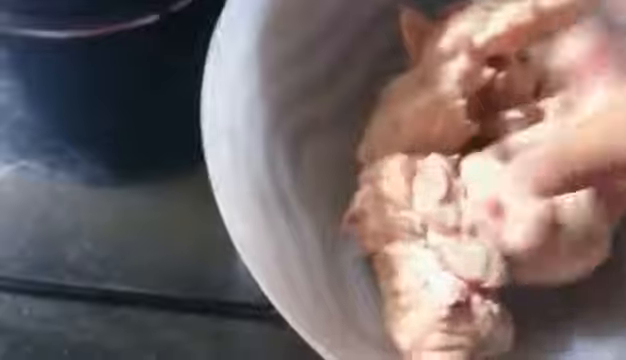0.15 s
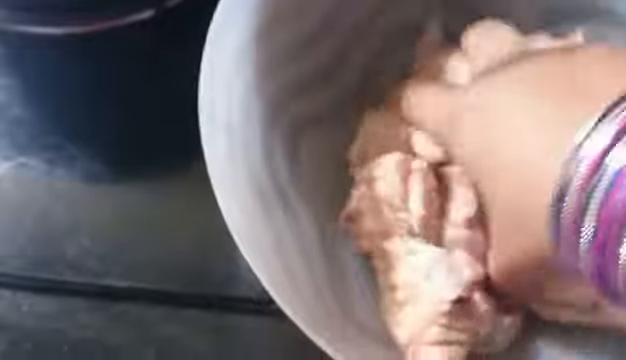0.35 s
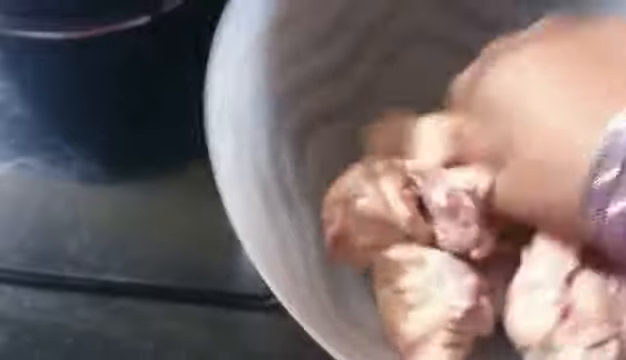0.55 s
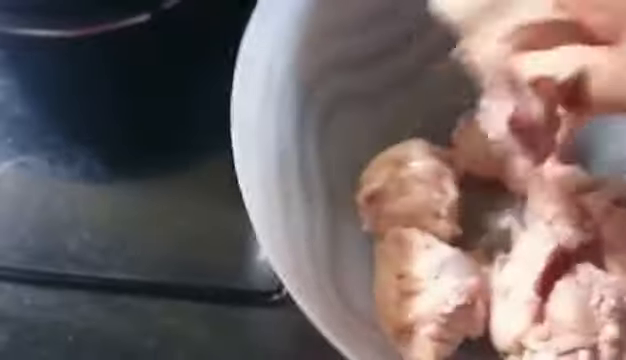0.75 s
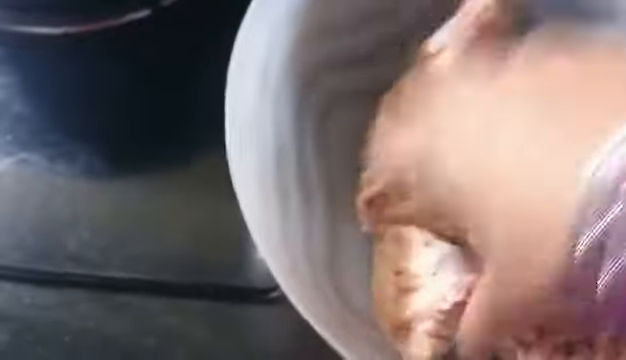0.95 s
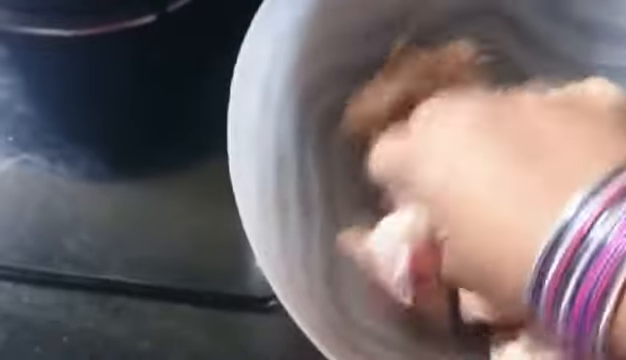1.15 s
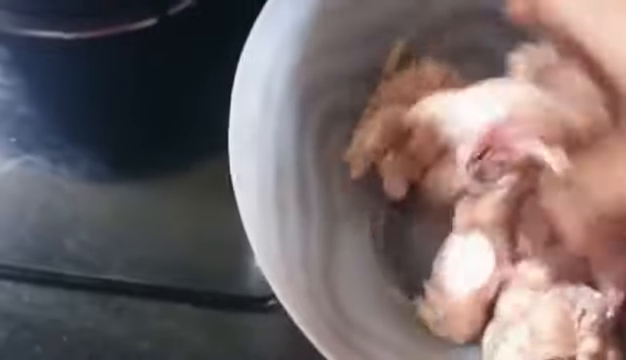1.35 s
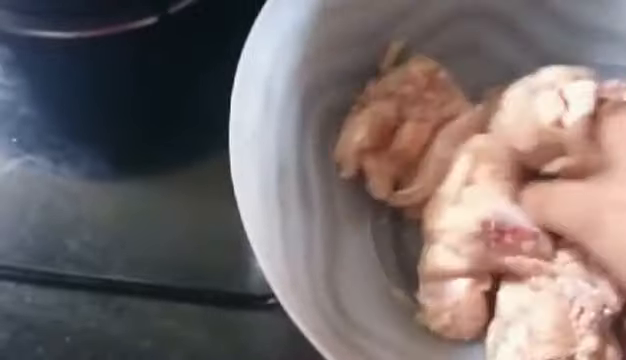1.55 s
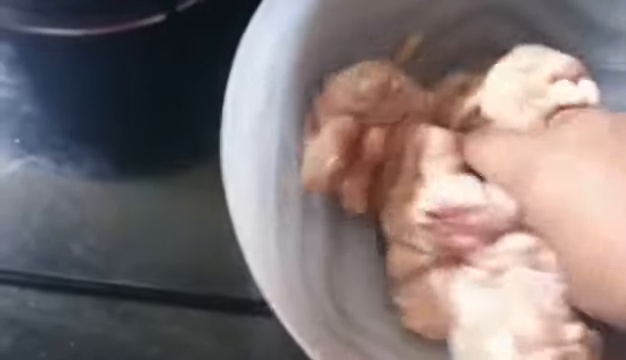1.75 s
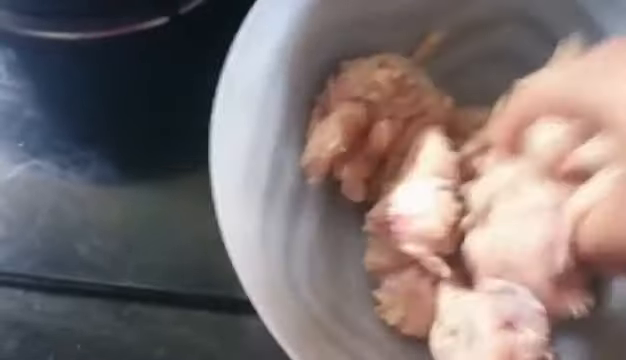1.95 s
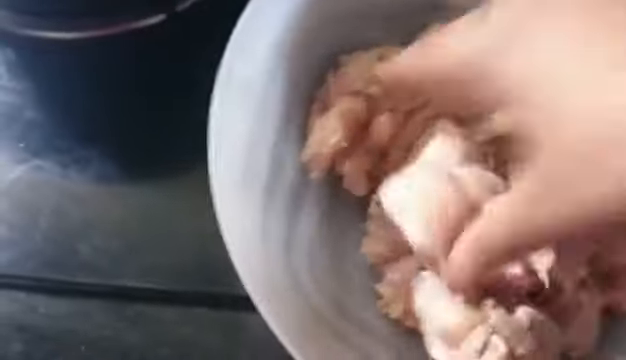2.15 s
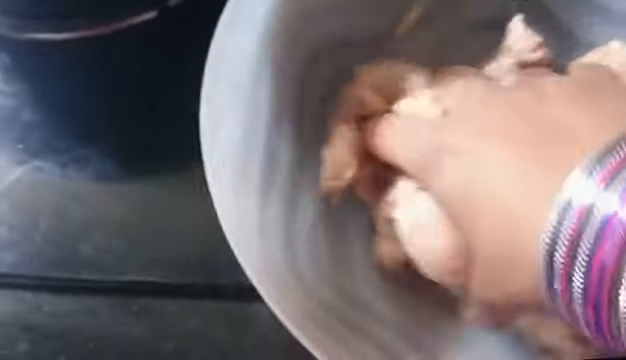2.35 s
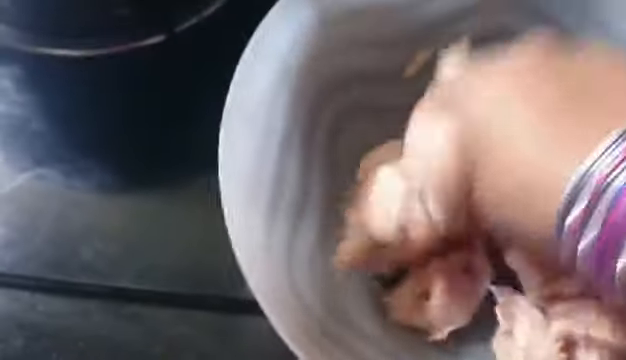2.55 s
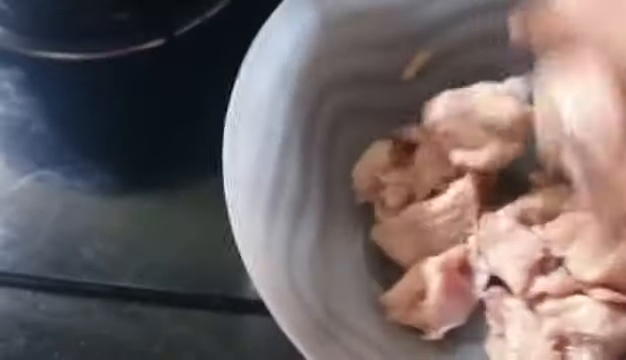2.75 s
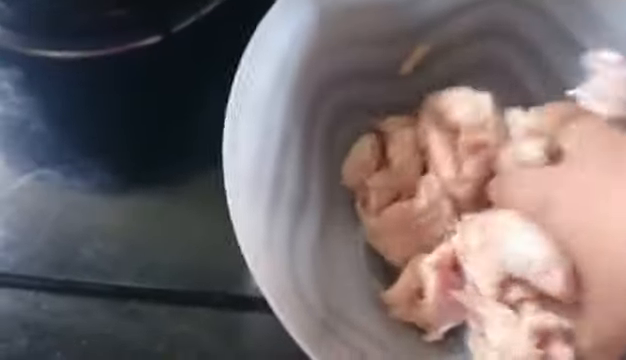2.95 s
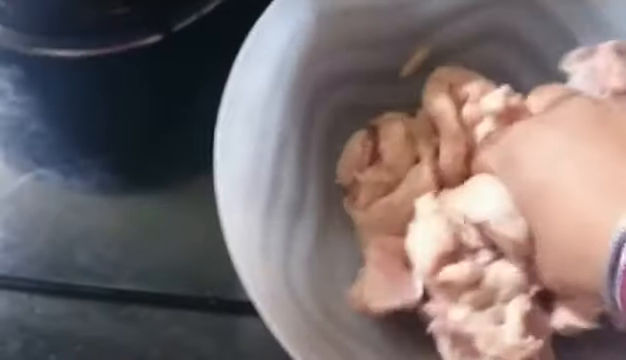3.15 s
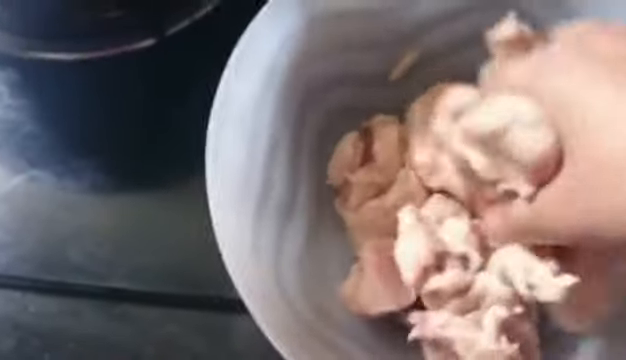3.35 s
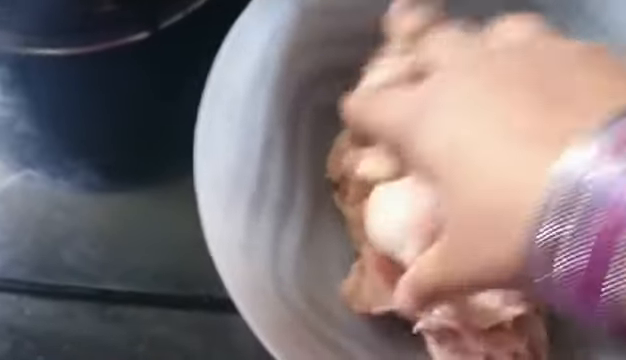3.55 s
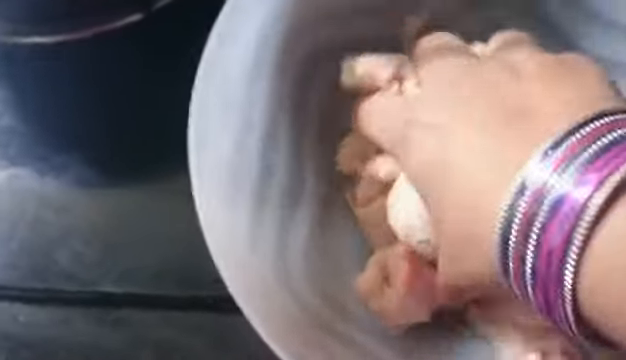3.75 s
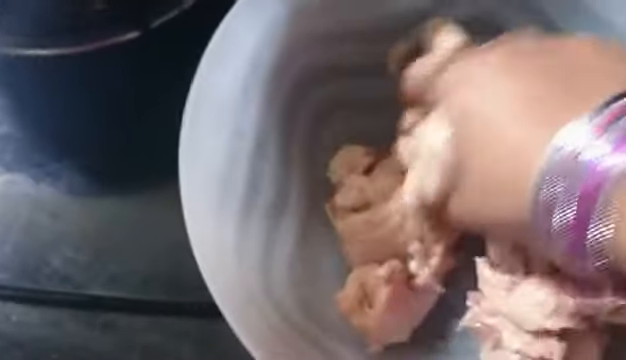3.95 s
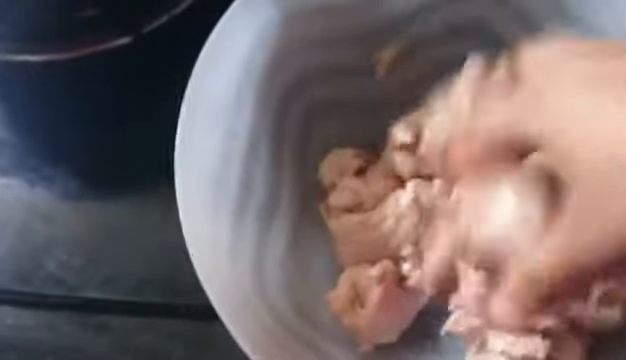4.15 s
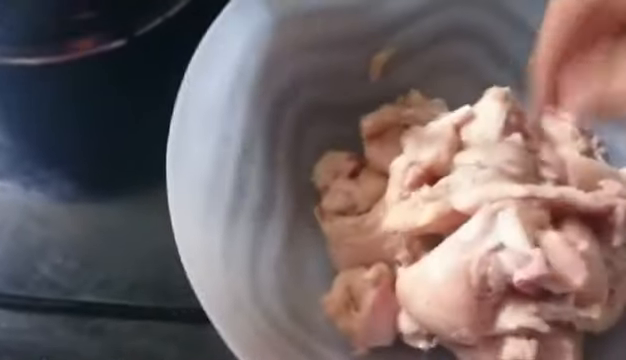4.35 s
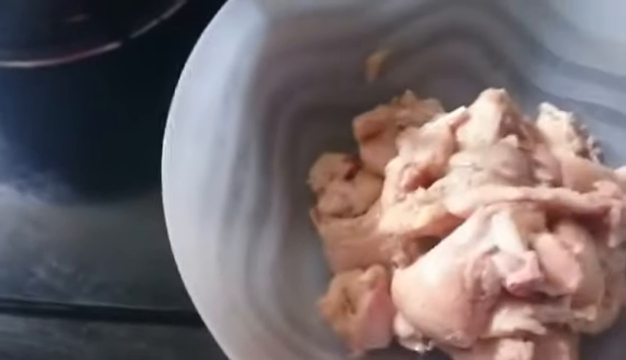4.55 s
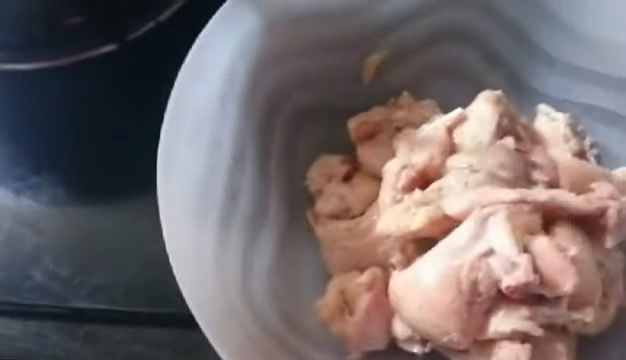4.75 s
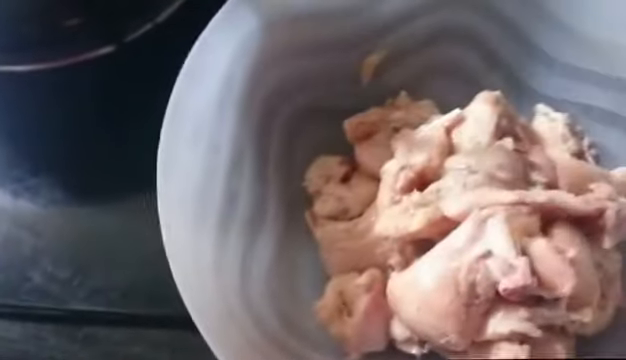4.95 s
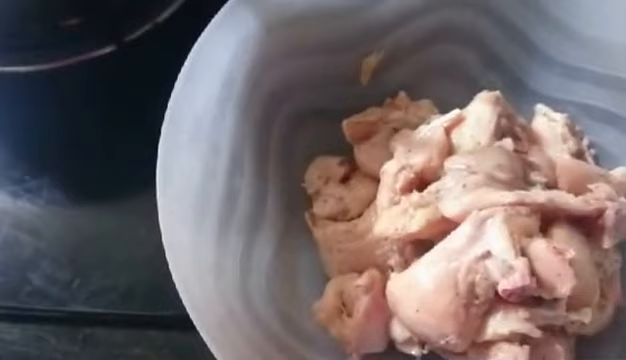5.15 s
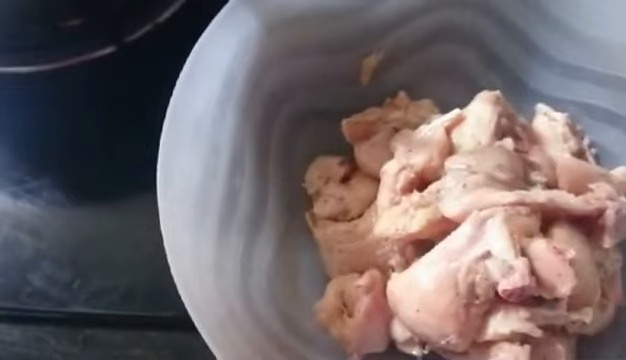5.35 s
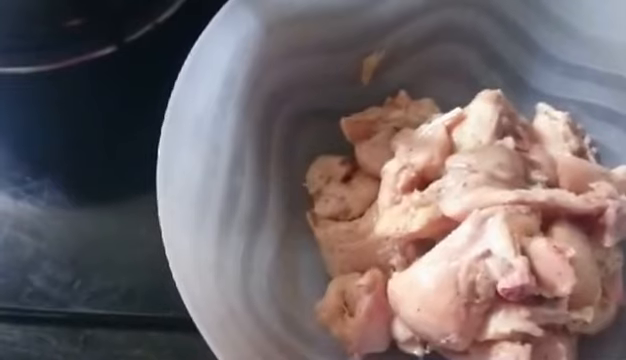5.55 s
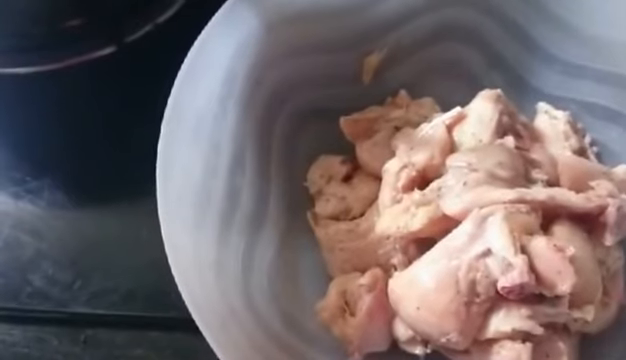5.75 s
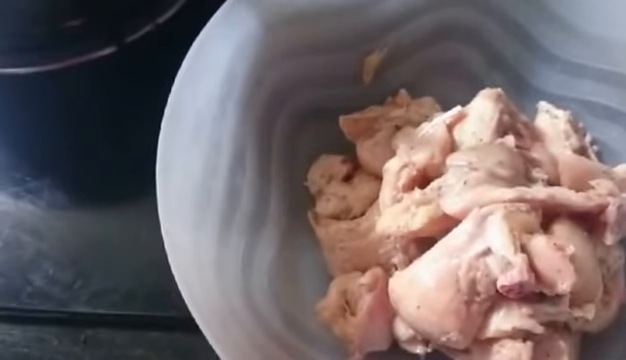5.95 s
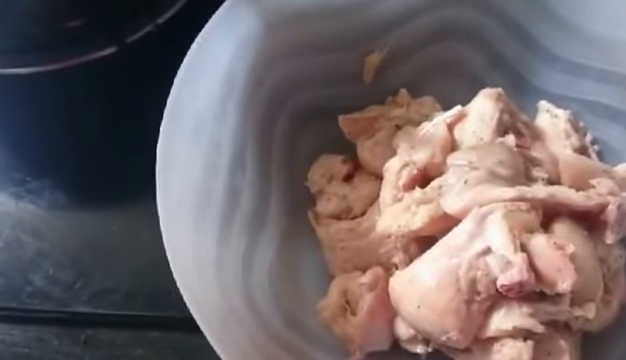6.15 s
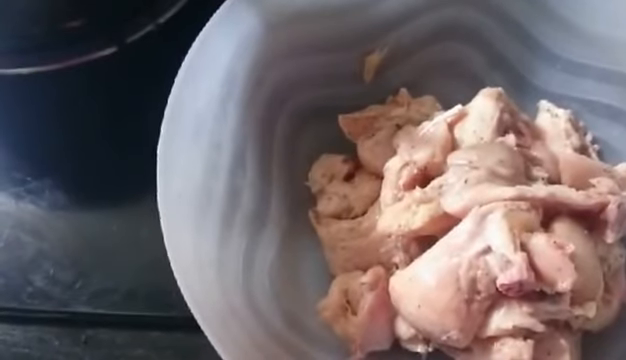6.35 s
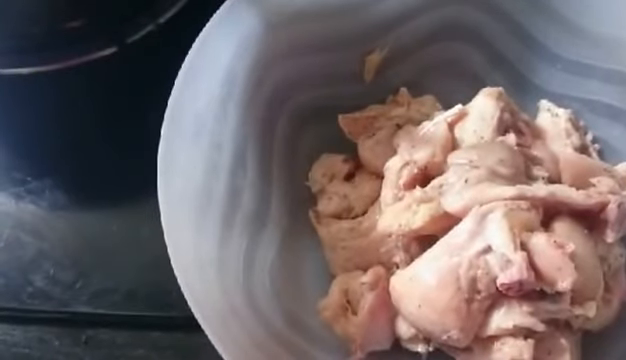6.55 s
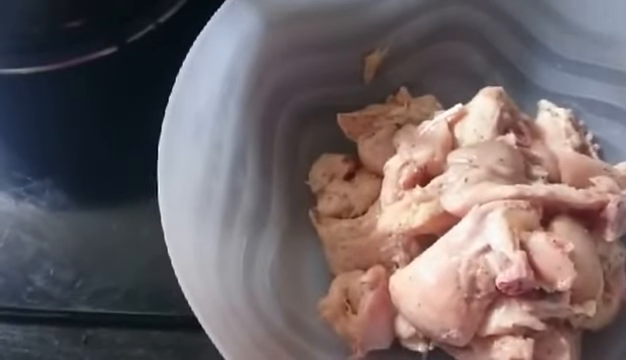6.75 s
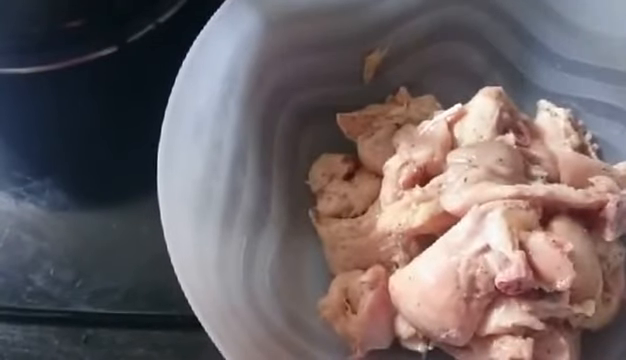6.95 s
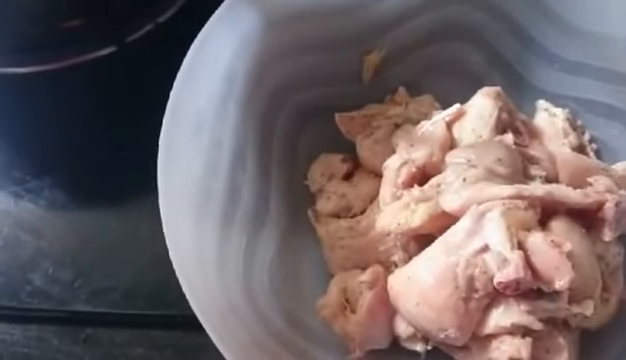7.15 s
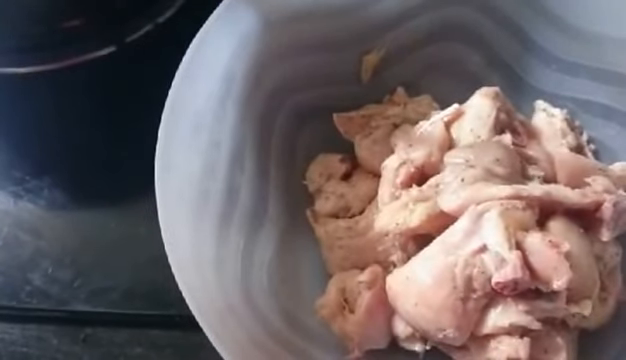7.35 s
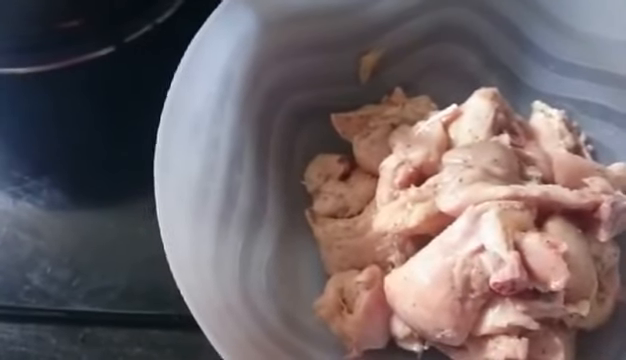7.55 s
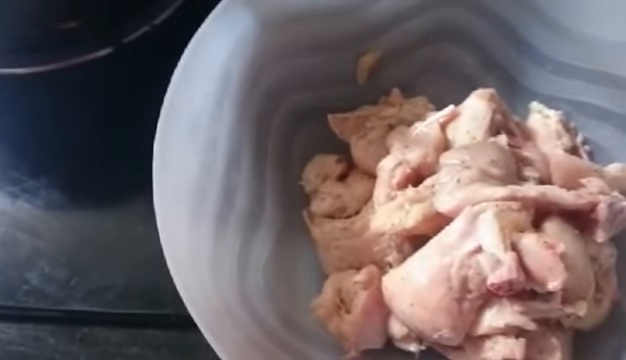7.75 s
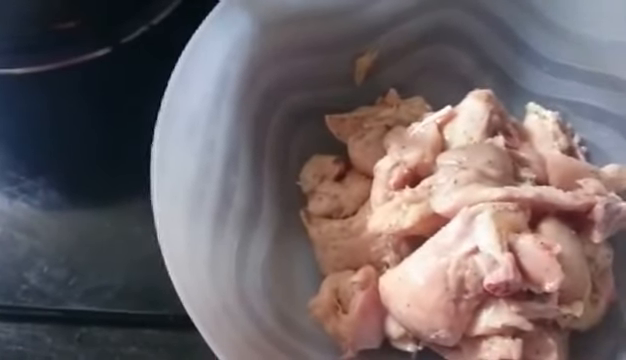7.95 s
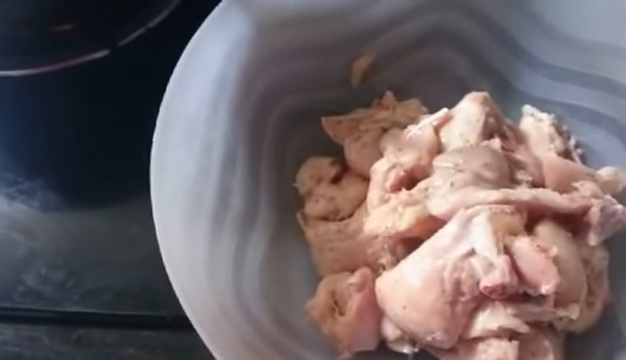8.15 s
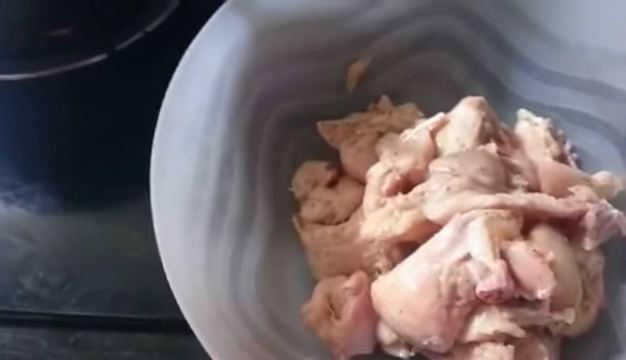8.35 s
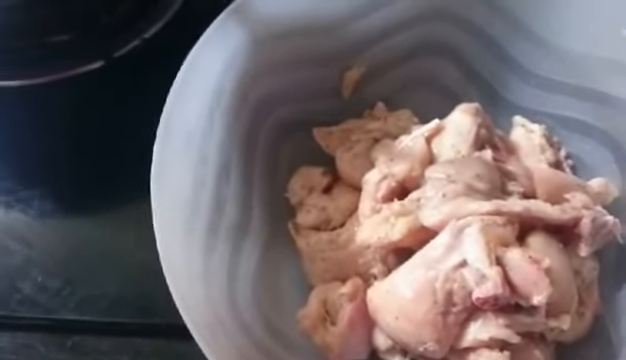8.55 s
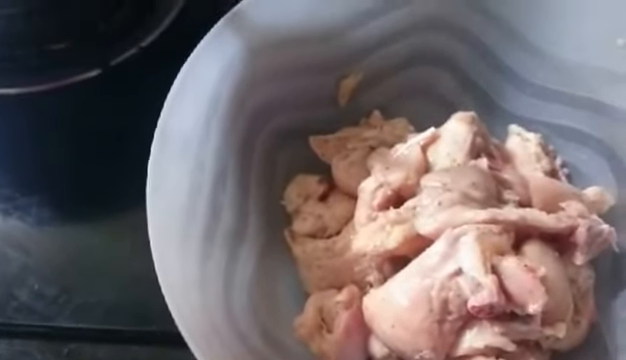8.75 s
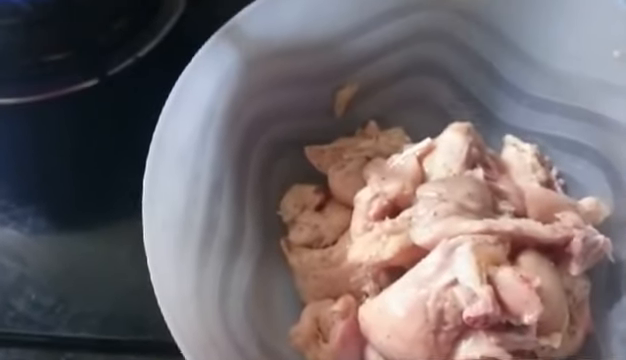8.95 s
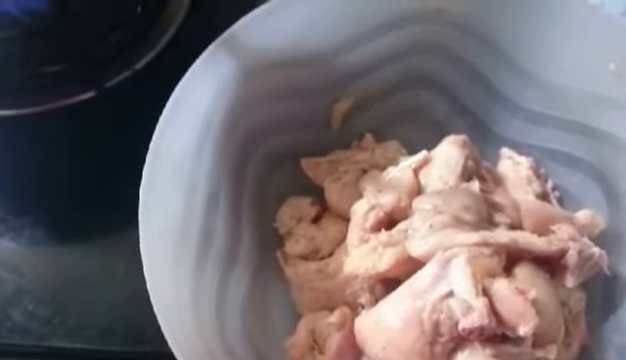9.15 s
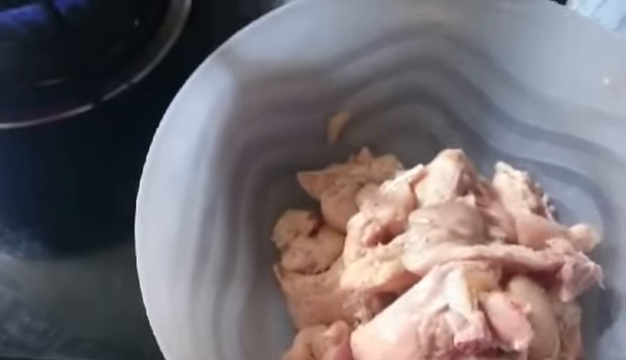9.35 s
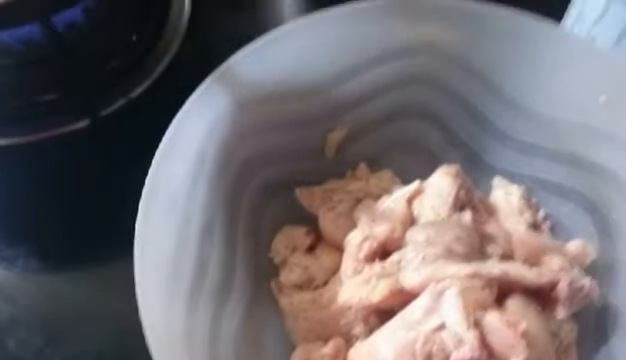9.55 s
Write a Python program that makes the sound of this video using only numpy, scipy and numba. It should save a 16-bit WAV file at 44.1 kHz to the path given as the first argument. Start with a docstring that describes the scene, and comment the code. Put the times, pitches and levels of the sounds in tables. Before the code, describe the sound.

Close wet squishes and sharp little pops of raw meat kneaded in a bowl, then quiet faint ticks, ending in hard jar clacks.

```python
"""A bangled hand kneads wet raw chicken in a plastic bowl close to a two-port phone in a hard-walled kitchen.
Throughout: faint filtered-noise hiss; now and then far bird-like whistles, gliding sines.
First 5 s: air pockets pop and crackle (damped rising sines, noise) and ring the bowl; glass bangles clink (modes).
Near 5 s a lidded jar is moved (modes, noise cracks, thuds); a faint rustle of tiny bursts and sparser pops follow.
From 8.5 s the jar knocks again, is dragged ever louder and lands on the counter."""
import sys
import numpy as np
from scipy import signal
from scipy.fft import rfft, irfft, next_fast_len
from scipy.io import wavfile
from scipy.ndimage import uniform_filter1d
from numba import njit

SR = 44100
rng = np.random.default_rng(int(sys.argv[2]) if len(sys.argv) > 2 else 0)


def output_pcm(signal):
    """Save a mono or channel-first signal as 16-bit PCM at the path in sys.argv[1].

    Samples are clipped to [-1, 1] before scaling.
    """
    pcm = np.clip(np.atleast_2d(signal).T, -1, 1) * 32767
    wavfile.write(sys.argv[1], SR, np.round(pcm).astype(np.int16))


N = 422919

# Levels are relative within a layer unless a reference is given; layer gains follow in the functions.
# Squeezes of the hand. Each row: full grip in [s], held [s], crackle level [dB], crackle pitch [Hz],
# slaps in the bowl re crackle [dB], fine fizz re crackle [dB].
SQUEEZES = [(0.236, 0.015, -36.5, 3870, -34, -31), (.36, 0.033, -44, 2380, -31, -14),
            (.5, 0.027, -53, 3100, -12.5, -13), (.92, 0.039, -40.5, 3130, -13, -19),
            (1.05, 0.018, -52, 2570, -27, -6.5), (1.429, 0.093, -43, 2800, -23.5, -18),
            (1.49, .13, -35.5, 3140, -20.5, -15), (2.14, 0.071, -52, 2140, -9.5, -1.5),
            (2.24, 0.041, -35, 2890, -18.5, -22), (2.34, 0.043, -45, 3700, -17.5, -7),
            (2.798, 0.047, -46, 2500, -12, -10.5), (2.96, 0.049, -45, 3280, -15.5, -14),
            (3.55, 0.021, -46.5, 2500, -21.5, -16), (3.64, 0.055, -41.5, 2800, -18, -13),
            (3.78, 0.018, -53.5, 3200, -16, -7), (4.24, 0.014, -52.5, 5060, -35, -5.5),
            (4.61, 0.011, -57, 5500, -34, -7)]
# The hand moving steadily in the heap. One row, columns as for the squeezes.
STIR = (0.07, 4, -58, 4000, -20, -9.5)
# Single air pockets bursting. Each row: start [s], level [dB], pitch [Hz], bowl ring re level [dB].
POPS = [(0.195, -35, 2900, -40), (0.2173, -29, 3200, -32), (0.2997, -28, 3150, -24),
        (0.3381, -33, 1930, -6), (0.3918, -14.5, 1940, -21), (0.446, -28.5, 5700, -32),
        (0.5601, -30.5, 5760, -38), (0.619, -31, 6000, -24), (0.6529, -30.5, 5600, -29),
        (0.683, -32, 6400, -37), (0.794, -11, 2790, -30.5), (0.7965, -14.5, 3600, -21),
        (0.8961, -13.5, 2380, -20.5), (0.9014, -15, 2710, -21), (0.9462, -21, 2200, -8),
        (1.062, -32, 2400, -21), (1.1533, -29.5, 3500, -19.5), (1.2012, -29.5, 4200, -14),
        (1.4017, -27, 3680, -21), (1.4556, -29.5, 2200, -23), (1.4681, -18.5, 1985, -26),
        (1.4854, -20, 3700, -14), (1.5179, -20.5, 4930, -29), (1.54, -16.5, 3570, -16.5),
        (1.5956, -22.5, 2100, -15), (1.8268, -30, 2500, -42), (2.0075, -18, 6420, -21),
        (2.0123, -19, 2720, -30), (2.1236, -27, 2210, -7), (2.1577, -24.5, 1700, -20),
        (2.2653, -24, 3480, -11.5), (2.3426, -20.5, 4100, -17.5), (2.4179, -29, 1556, -13),
        (2.4643, -29, 3400, -42), (2.5462, -28, 4430, -53), (2.6608, -28.5, 1560, -6),
        (2.788, -29, 1900, -24), (2.829, -29, 2260, -19), (2.9432, -38, 5470, -30),
        (2.9921, -26, 5500, -20), (3.135, -33, 2840, -18), (3.3472, -24, 3290, -15.5),
        (3.4065, -33.5, 5750, -28), (3.4426, -35, 4820, -34), (3.5485, -32, 2000, -28),
        (3.6406, -33, 3460, -8), (3.6967, -26, 2220, -20), (3.7556, -33.5, 2540, -7),
        (3.7716, -20.5, 2460, -31), (3.8538, -30, 3800, -37), (3.8844, -29, 5820, -60),
        (3.9632, -30, 4300, -62), (4.0373, -22.5, 2236, -12.5), (4.2068, -50, 4550, -22),
        (4.2367, -25, 5900, -38), (4.3382, -39, 5330, -46), (5.177, -29.5, 4860, -16.5),
        (6.475, -38, 3830, -41), (6.4971, -36.5, 5210, -41), (6.5784, -35, 3370, -39),
        (6.754, -36.5, 6300, -32), (6.9234, -33, 5760, -40), (6.9905, -37, 2990, -35),
        (7.3951, -33, 5040, -34), (7.4632, -36, 4000, -40), (7.4918, -40, 3540, -40),
        (7.636, -27.5, 5640, -45), (7.849, -42.5, 6670, -33), (8.001, -40, 5040, -37),
        (8.1376, -31.5, 5770, -49), (8.843, -36, 5890, -20), (8.9161, -51, 6060, -14),
        (9.2054, -33, 3200, -10)]
# Bowl resonances. Each row: frequency [Hz], width [Hz], level [dB].
BOWL_MODES = [(350, 104, -0.5), (741, 97, 10)]
# Lowest mode of the counter top. Each row: frequency [Hz], width [Hz], level [dB].
RUMBLE_MODES = [(82.2, 12, 0)]
# Level of the faint rustle of tiny bursts. Each row: time [s], level [dB].
RUSTLE = [(4.75, -48), (4.88, -71), (5.06, -46.5), (5.19, -49), (6.29, -73), (7.09, -56), (7.54, -51),
          (7.65, -49), (8.21, -66), (9.18, -46.5), (9.29, -47), (9.59, -51)]
# Bangles touching. Each row: start [s], level [dB], main tone [Hz].
CLINKS = [(1.48, -46, 14200), (1.5409, -40, 13260), (1.5683, -39, 13700), (1.5968, -42, 13000),
          (2.177, -39, 13600), (4.612, -44.5, 13720), (4.632, -55, 13500)]
# Bangle modes. Each row: multiple of the main tone [ratio], level [dB], t60 [s].
BANGLE_MODES = [(.425, 3, 0.055), (.69, -11, 0.054), (.73, -12, 0.059), (1.0, 4, .055), (1.09, -7, 0.038)]
# Jar and lid meeting the counter. Each row: start [s], crack [dB], thud [dB], jar ring [dB], lid ring [dB].
KNOCKS = [(4.8647, -39, -33, -51.5, -50), (4.9402, -49, -35.5, -63, -62), (4.9626, -54, -49, -55, -55),
          (5.0025, -39, -37, -39.5, -46), (5.122, -40.5, -49.5, -55, -54.5), (8.5650, -13, -40, -65, -23),
          (8.6057, -24.5, -44, -55, -33), (8.6329, -29.5, -32.5, -68, -40), (8.7016, -42, -39, -58, -69),
          (9.0589, -19.5, -33.5, -32, -40), (9.0632, -11, -31.5, -23.5, -37)]
# Jar modes. Each row: frequency [Hz], level [dB], t60 [s].
JAR_MODES = [(727, -4, .11), (1084, -2, .2), (1443, 0, .18), (3264, -2, .2), (3330, -2, .16),
             (3450, -6, .1), (5150, -6, .09), (6355, -10, .06)]
# Lid modes. Each row: frequency [Hz], level [dB], t60 [s].
LID_MODES = [(1556, -5, .07), (2340, -2, .07), (2530, 2, .14), (3290, -6, .12), (3780, -8, .07),
             (5290, -2, .08)]
# Counter resonances under the jar. Each row: frequency [Hz], width [Hz], level [dB].
COUNTER_MODES = [(123, 73, -16), (280, 157, -9.5), (590, 215, -3), (840, 300, -10.5)]
# Faint far whistles. Each row: start [s], length [s], start pitch [Hz], end pitch [Hz], level [dB].
WHISTLES = [(.0, 0.048, 4580, 4550, -57), (0.01, 0.26, 3850, 3700, -66), (4.447, 0.095, 2460, 2550, -65),
            (5.403, 0.13, 4550, 4510, -59.5), (5.508, 0.45, 3390, 3460, -64.5),
            (6.556, 0.12, 3450, 3380, -57), (6.988, 0.1, 2450, 2420, -64), (7.07, 0.068, 3400, 3380, -61),
            (7.274, 0.09, 3410, 3410, -64), (7.888, 0.13, 2590, 2420, -63), (8.276, 0.2, 4520, 4290, -61),
            (8.361, .2, 3800, 3560, -63)]
# Hiss spectrum. Each row: frequency [Hz], relative density [dB per Hz].
HISS_SPECTRUM = [(25, -3), (50, -13.5), (95, -8), (180, -19), (800, -17.5), (980, -13), (1250, -17),
                 (2800, -10), (5300, -9), (5950, -0.5), (6400, -7), (7100, -20), (9500, -26), (13000, -16),
                 (16300, -27.5)]
# Port balance of the hiss. Each row: frequency [Hz], left minus right [dB].
HISS_BALANCE = [(60, -6), (110, -1), (200, -1), (380, -8), (700, -5.5), (1290, -5.5), (2380, -3.5),
                (4400, -4), (8120, 9), (15000, 0)]
# Port balance of the near sounds. Each row: frequency [Hz], left minus right [dB].
PORT_BALANCE = [(60, -9), (110, -5), (200, -6), (380, -6), (700, -9), (1290, -3.5), (2380, -3.5),
                (4400, 1.5), (8120, 5.5), (15000, 5.5)]
# Decay of the kitchen. Each row: frequency [Hz], t60 [s].
ROOM_T60 = [(100, 0.53), (1000, 0.46), (4000, 0.34), (12000, 0.36)]

GRIP_S, LET_GO_DB_PER_S = 0.035, 150  # each squeeze: quick grip, hold, steady fade
KNEAD_END_S = 5.
POCKET_HZ = 3000  # reference pocket
SNAP_DB, SNAP_DB_PER_OCTAVE = -17.5, 5  # small pockets snap more sharply
LEFT_DB_PER_OCTAVE, PAN_SPREAD_DB = -0.5, 4.5  # left minus right
THUMP_DB = -19.5
KNOCK_SNAP_DB, KNOCK_LEFT_DB = -34.5, -2  # treble snap re the crack; left minus right
LID_ROUGH_DB = 3
DRAG_FROM_S, DRAG_TO_S, DRAG_DB, DRAG_DB_PER_S = 8.93, 9.056, -43.5, 120  # DRAG_DB is reached at the end
HISS_DB = -58.5  # rms of the port mean
ROOM_DB = -5
PORT_LAG_S = .0002  # spread of the arrival lag between the ports
TOP_HZ = 16400


def effort():
    """Gains of crackle, slaps and fizz and the crackle pitch: squeeze powers add up over steady stirring."""
    t = np.arange(N) / SR
    power, octave = np.zeros((3, N)), 0
    for s, held_s, db, hz, slaps_db, fizz_db in [STIR] + SQUEEZES:
        grip = np.clip(1 + (t - s) / GRIP_S, 0, 1)
        shape = grip * undb(db - LET_GO_DB_PER_S * np.maximum(t - s - held_s, 0))
        power += (shape * undb([[0], [slaps_db], [fizz_db]])) ** 2
        octave = octave + shape ** 2 * np.log2(hz)
    crackle_gain, slaps_gain, fizz_gain = np.sqrt(power)
    crackle_hz = 2 ** (octave / np.maximum(power[0], 1e-30))  # power-weighted mean pitch
    return crackle_gain, slaps_gain, fizz_gain, crackle_hz


def knead():
    """Crackle, fine fizz and soft slaps in the bowl follow the squeeze, in uneven spurts; the counter shakes."""
    crackle_gain, slaps_gain, fizz_gain, crackle_hz = effort()
    crackle = bubbles(crackle_hz, 0.53, 2.2, 2.7, KNEAD_END_S, count=13000)
    fizz = bubbles(10300, 0.26, 0.96, 4.5, KNEAD_END_S, count=18000)
    slaps = bubbles(706, 0.58, 0.86, 1.4, KNEAD_END_S, count=2000)
    bowl = slaps + undb(-6.0) * unit(body(slaps, BOWL_MODES))
    wet = crackle_gain * band(crackle, 1150, 19000) + fizz_gain * fizz
    wet = wet + slaps_gain * unit(band(bowl, 220, 1540))
    rumble = unit(body(rng.standard_normal(N), RUMBLE_MODES))
    shake = undb(-31) * slaps_gain ** 0.65 * rumble
    return undb(4.2 * walk(75)) * wet + shake


def pops(count=7):
    """Each pocket tears in a quick cluster of bursts near its pitch: snap, wet tail, push on bowl and counter."""
    s, db, hz, bowl_db = np.transpose(POPS)
    octaves_up = np.log2(hz / POCKET_HZ)
    snap_db = SNAP_DB + SNAP_DB_PER_OCTAVE * octaves_up
    pan_db = LEFT_DB_PER_OCTAVE * octaves_up + PAN_SPREAD_DB * rng.standard_normal(len(s))
    tone = scatter(s, hz, db, pan_db, 5.25)

    late_s = 0.0027 * rng.exponential(size=(len(s), count))
    tear_s = s[:, None] + late_s
    tear_hz = hz[:, None] * 2 ** (0.42 * rng.standard_normal((len(s), count)))
    tear_db = db[:, None] - 900 * late_s  # later bursts are weaker
    tear = scatter(tear_s.ravel(), tear_hz.ravel(), tear_db.ravel(), np.repeat(pan_db, count), 2.3)

    wet = band(burst(blows(s, db, pan_db), 0.06), 2900, 6500)
    snap = band(burst(blows(s, db + snap_db, pan_db), 0.021), 5900, 14400)
    ring = band(body(blows(s, db + bowl_db, pan_db), BOWL_MODES), 340, 1760)
    thump = band(burst(blows(s, db, 0 * s), 0.087, alike=0.89), 60, 140)  # jolts bowl and counter
    out = undb(-2) * tone + undb(-6) * tear + undb(-9) * wet
    return out + undb(-2) * snap + undb(-8.5) * ring + undb(THUMP_DB) * thump


def rustle():
    """Faint uneven rustle of tiny bursts around 3.6 kHz, from 4.75 s on."""
    time_s, level_db = np.transpose(RUSTLE)
    db = np.interp(np.arange(N) / SR, time_s, level_db, left=-200., right=-200.)
    bursts = bubbles(3590, 0.52, 1.8, 3.4, (N - 1) / SR, count=15000)
    return undb(db - 11 + 5.7 * walk(25)) * bursts


def bangles():
    """Glass rings touching: inharmonic modes on each clink's own pitch."""
    s, db, hz = np.transpose(CLINKS)
    return rings(s, db + 2.5, 0 * s, BANGLE_MODES, scale=hz)


def jar():
    """A crack of contact, the modes of jar and lid, the dull thud of the counter, and a short drag."""
    s, db, thud_db, jar_db, lid_db = np.transpose(KNOCKS)
    pan_db = KNOCK_LEFT_DB + 0 * s
    crack = band(burst(blows(s, db, pan_db), 0.018), 2120, 5150)
    crack = crack + band(burst(blows(s, db + KNOCK_SNAP_DB, pan_db), 0.099), 4500, 14000)
    jar_ring = rings(s, jar_db - 2, pan_db, JAR_MODES)
    lid_ring = rings(s, lid_db - 3.0, pan_db, LID_MODES)
    lid_ring = lid_ring * undb(LID_ROUGH_DB * walk(220))  # the loose lid rings rough
    thud = body(burst(blows(s, thud_db, pan_db), 0.14, alike=1.0), COUNTER_MODES)
    thud = band(thud, 175, 3500)
    return undb(6.5) * crack + jar_ring + lid_ring + undb(-16.0) * thud + drag()


def drag():
    """Uneven rubbing noise excites the jar's modes, ever louder until the jar lands."""
    t = np.arange(N) / SR
    rub = rng.standard_normal(N) * undb(3.1 * walk(200))
    sing = body(rub, [(hz, 40, mode_db) for hz, mode_db, _ in JAR_MODES])
    pressure = undb(np.minimum(DRAG_DB + DRAG_DB_PER_S * (t - DRAG_TO_S), DRAG_DB))
    pressure = pressure * (t > DRAG_FROM_S) * (t < DRAG_TO_S)
    return pressure * unit(unit(sing) + undb(1) * unit(band(rub, 240, 3700)))


def kitchen(x):
    """Diffuse tail, alike at the two ports only in the bass, its decay set per octave."""
    t, tail = np.arange(SR // 2) / SR, 0
    for hz in 125 * 2 ** np.arange(8):
        alike = 1 / (1 + (hz / 900) ** 2)
        both, own = rng.standard_normal(len(t)), rng.standard_normal((2, len(t)))
        noise = np.sqrt(alike) * both + np.sqrt(1 - alike) * own
        decay = undb(-60 * t / at_hz(ROOM_T60, hz))
        tail = tail + band(noise, hz / np.sqrt(2), hz * np.sqrt(2)) * decay
    tail *= np.clip(t / 0.00087, 0, 1)
    tail /= np.sqrt(np.sum(tail ** 2) / 2)
    return signal.fftconvolve(x.mean(0)[None], tail, axes=1)[:, :N]


def ports(x):
    """The phone's body colours the two ports differently."""
    size = next_fast_len(N + 4096)
    hz = np.arange(size // 2 + 1) * SR / size
    half = undb(at_hz(PORT_BALANCE, hz) / 2)
    return irfft(rfft(x, size) * np.array([half, 1 / half]), size)[:, :N]


def whistles():
    """Thin gliding sines under half-sine swells, wavering as if from far off."""
    out, t = np.zeros(N), np.arange(N) / SR
    for s, length_s, start_hz, end_hz, db in WHISTLES:
        u = np.clip((t - s) / length_s, 0, 1)
        phase = 2 * np.pi * np.cumsum(start_hz + (end_hz - start_hz) * u) / SR
        out += undb(db) * np.sin(np.pi * u) * np.sin(phase)
    return out * undb(4.0 * walk(150))


def hiss():
    """Steady shaped noise; octave bands swell a little; the ports share only part of the low end."""
    size = next_fast_len(N)
    hz = np.arange(size // 2 + 1) * SR / size
    octaves_up = np.log2(np.maximum(hz, 1) / 200)
    alike = np.clip(.5 - 0.12 * octaves_up ** 2, 0, 1)
    both, own = rfft(rng.standard_normal(size)), rfft(rng.standard_normal((2, size)))
    noise = np.sqrt(alike) * both + np.sqrt(1 - alike) * own
    tilt_db = at_hz(HISS_BALANCE, hz) * np.array([[.5], [-.5]])
    spectrum = noise * undb(at_hz(HISS_SPECTRUM, hz) + tilt_db)
    swell_db = 1.3 * walk(1.5)  # common to all bands
    octave = np.round(np.log2(np.maximum(hz, 1)))
    x = 0
    for k in range(4, 15):
        x = x + irfft(spectrum * (octave == k), size)[:, :N] * undb(swell_db + 1.35 * walk(26))
    return x * undb(HISS_DB) / np.sqrt(np.mean(x.mean(0) ** 2))


def bubbles(centre_hz, octaves, cycles, spread_db, end_s, count):
    """A dense stream of tiny bursts at rms 1; a few are much larger than the rest."""
    when, rank = rng.random((count, 2)).T
    size, side = rng.standard_normal((count, 2)).T
    s = when * end_s
    hz = (centre_hz + np.zeros(N))[(s * SR).astype(int)] * 2 ** (octaves * size)
    # small, high pockets die sooner but burst harder
    db = spread_db * np.minimum(-np.log(1 - rank), 4.5) + 4.7 * octaves * size
    return unit(scatter(s, hz, db, 7.8 * side, cycles))


def rings(s, db, pan_db, modes, scale=1):
    """Modes (Hz or ratio, dB, t60 s) struck at times s; every blow weights them a little anew."""
    out = 0
    for hz, mode_db, t60_s in modes:
        spot_db = 0.5 * rng.standard_normal(len(s))
        cycles = hz * scale * max(t60_s, .01) / np.log(1000)
        out = out + scatter(s, hz * scale + 0 * s, db + mode_db + spot_db, pan_db, cycles, glide=0.)
    return out


def scatter(s, hz, db, pan_db, cycles, rise=0.47, glide=0.019):
    """Grains from scattered spots: each has its own lag between the ports."""
    lag = np.clip(PORT_LAG_S * SR * rng.standard_normal(len(s)), -60, 60).astype(np.int64)
    hz = np.clip(hz, 60., .4 * SR)
    left, right = undb(db + pan_db / 2), undb(db - pan_db / 2)
    return grains(N, (s * SR).astype(np.int64), lag, hz, cycles + 0 * s, rise, glide, left, right)


@njit
def grains(count, start, lag, hz, cycles, rise, glide, left, right):
    """Sines that swell in over `rise` cycles, die by 1/e in `cycles` and glide up; right port `lag` samples later."""
    out = np.zeros((2, count + 128))
    for k in range(len(start)):
        turn = hz[k] / SR  # cycles per sample
        step = np.exp(turn * (2j * np.pi - 1 / cycles[k]))
        bend = np.exp(2j * np.pi * turn * turn * glide)
        z, onset = 1 + 0j, 1.
        for i in range(start[k], count):
            onset *= 1 - min(turn / rise, 1.)
            out[0, i] += left[k] * (1 - onset) * z.imag
            out[1, max(i + lag[k], 0)] += right[k] * (1 - onset) * z.imag
            z *= step
            step *= bend
            if abs(z) < .004:
                break
    return out[:, :count]


def blows(s, db, pan_db):
    """Two-channel train of impulses."""
    x = np.zeros((2, N))
    x[:, (np.asarray(s) * SR).astype(int)] = undb(db + np.array([pan_db, -pan_db]) / 2)
    return x


def burst(hits, t60_s, alike=0.94):
    """Noise that starts at each impulse and dies away, partly alike at the two ports."""
    alike = np.clip(alike, 0, 1)
    noise = np.sqrt(alike) * rng.standard_normal(N) + np.sqrt(1 - alike) * rng.standard_normal((2, N))
    return signal.lfilter([1], [1, -np.exp(-np.log(1000) / (t60_s * SR))], hits) * noise


def body(x, peaks):
    """Resonances (Hz, width Hz, dB) in parallel, each ringing at its dB after a unit blow."""
    out = 0
    for hz, width_hz, db in peaks:
        r, w = np.exp(-np.pi * width_hz / SR), 2 * np.pi * hz / SR
        out = out + undb(db) * signal.lfilter([0, np.sin(w)], [1, -2 * r * np.cos(w), r * r], x)
    return out


def band(x, lo_hz, hi_hz):
    """Band-pass."""
    return signal.sosfilt(signal.butter(2, [lo_hz, min(hi_hz, .45 * SR)], "band", fs=SR, output="sos"), x)


def walk(rate_hz):
    """Random levels held 1 / rate_hz s and slewed twice."""
    k = int(SR / rate_hz)
    held = np.repeat(rng.standard_normal(N // k + 1), k)
    return uniform_filter1d(uniform_filter1d(held, k), k)[:N]


def at_hz(table, hz):
    """A (Hz, value) table read on a log axis."""
    f, value = np.transpose(table)
    return np.interp(np.log(np.maximum(hz, 1)), np.log(f), value)


def undb(db):
    """dB to gain."""
    return 10 ** (np.asarray(db) / 20)


def unit(x):
    """Rms 1."""
    return x / np.sqrt(np.mean(x ** 2))


def scene():
    """Near sounds, their room tail, and the background."""
    near = knead() + pops() + rustle() + bangles() + jar()
    # small things radiate no deep bass
    near = signal.sosfilt(signal.butter(3, 70, "high", fs=SR, output="sos"), near)
    return ports(near + undb(ROOM_DB) * kitchen(near)) + whistles() + hiss()


def record(dry):
    """The phone cuts the deep bass and the top."""
    dry = signal.sosfilt(signal.butter(2, 45, "high", fs=SR, output="sos"), dry)
    return signal.sosfilt(signal.ellip(10, .2, 70, TOP_HZ, fs=SR, output="sos"), dry)


dry = scene()
out = record(dry)
output_pcm(out)
```